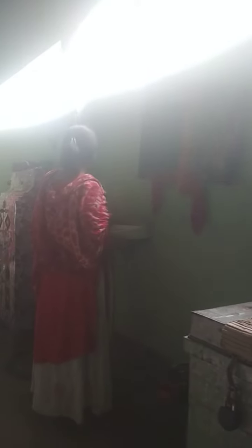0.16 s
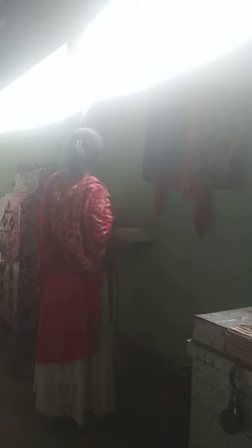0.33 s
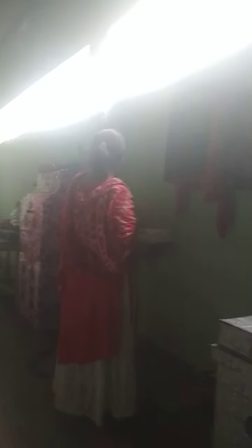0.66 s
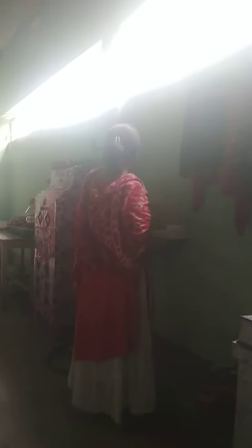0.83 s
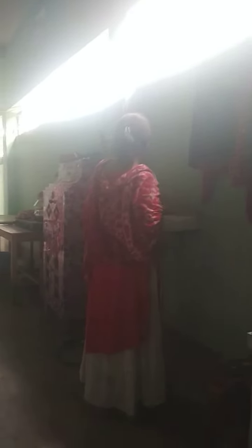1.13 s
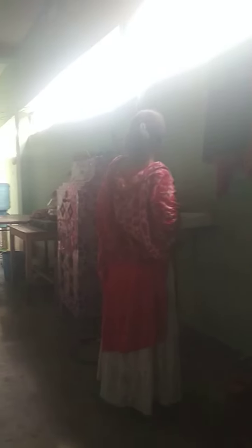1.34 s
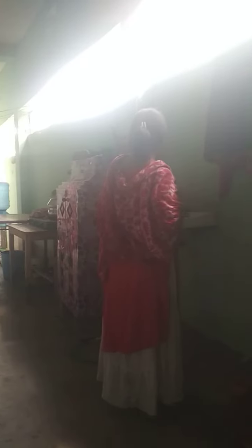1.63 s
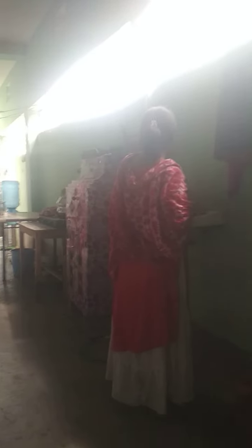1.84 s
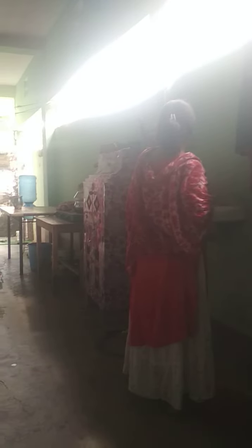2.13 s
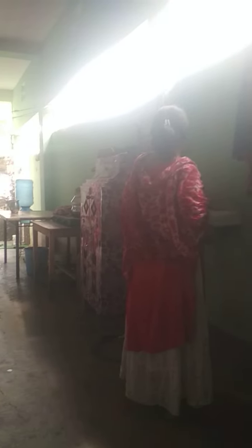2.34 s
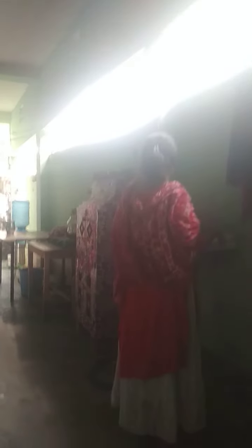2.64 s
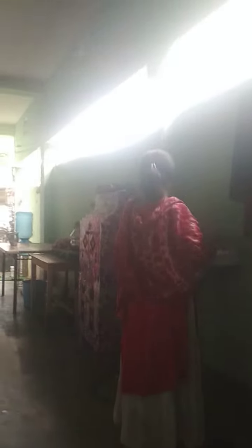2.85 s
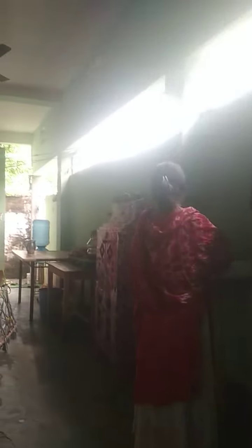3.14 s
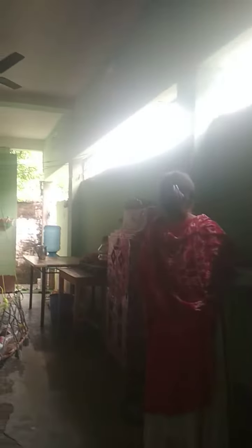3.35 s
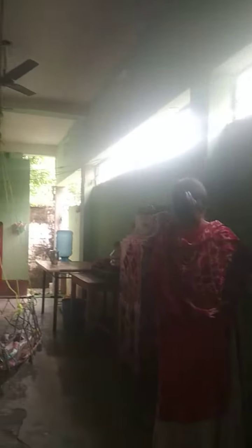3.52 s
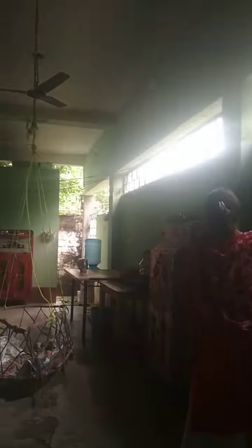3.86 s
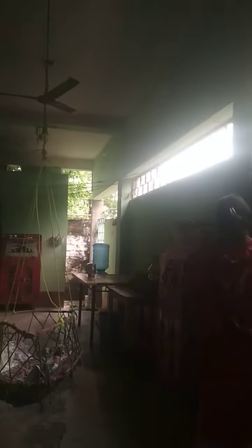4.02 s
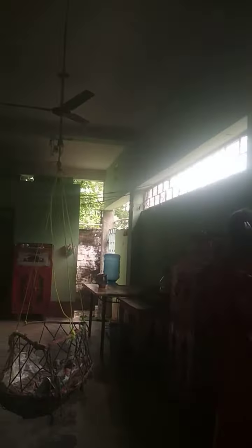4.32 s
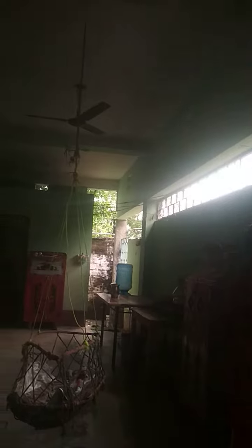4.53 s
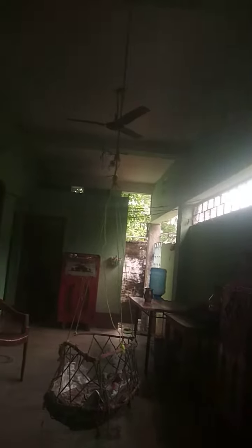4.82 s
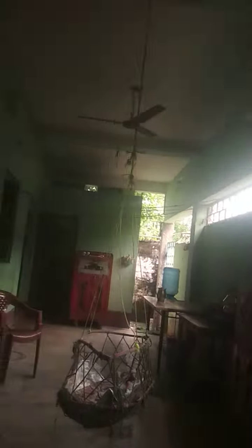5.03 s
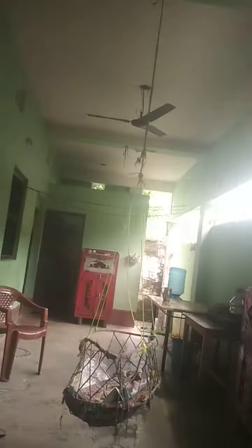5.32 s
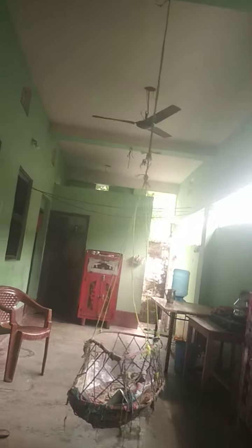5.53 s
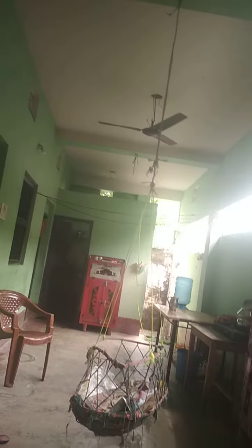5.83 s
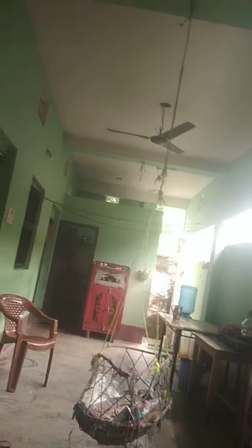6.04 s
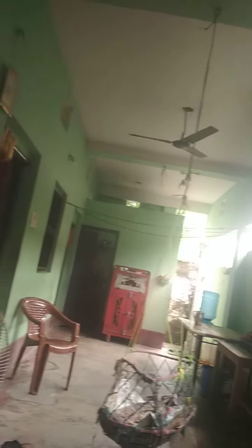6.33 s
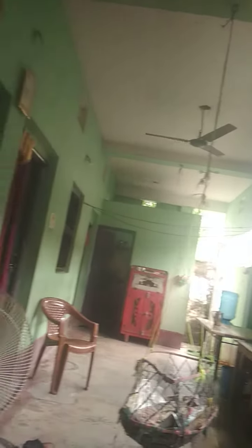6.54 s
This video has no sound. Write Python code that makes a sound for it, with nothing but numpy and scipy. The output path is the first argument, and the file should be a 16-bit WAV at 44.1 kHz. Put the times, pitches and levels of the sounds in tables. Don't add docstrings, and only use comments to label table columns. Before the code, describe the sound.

A steady low fan hum with a soft broad rush of air fills a bare concrete room, and its draught makes low, lumpy bumps on a phone microphone. From 0 to 1.7 seconds there are only drips, plinking bubbles, light spatter and faint slaps near 0.5 and 1.0, while a weak far motor drones at about 0.6 to 0.8 and 0.9 to 1.65. A full wet thump lands at 1.76 after a soft early touch, then more at 2.6, 3.2, 3.9 (the hardest), 4.65, 5.4 (boomier) and 6.2. Each is a dull cloth slap with a hollow tub boom and short wall rattle, echoing briefly. Between blows, droplets crackle, bubbles ring with gliding pitch, and water gurgles and fizzes from the cloth. Gusts are strongest around 3.5 to 4.8; the drone returns faintly near 2.4 and 4.3.

```python
import sys
import numpy as np
from scipy import signal
from scipy.io import wavfile
from scipy.ndimage import uniform_filter1d

SR = 44100
rng = np.random.default_rng(int(sys.argv[2]) if len(sys.argv) > 2 else 0)


def unload_audio(sound):
    columns = np.transpose(np.atleast_2d(sound))
    steps = np.round(np.clip(columns, -1, 1) * 32767)
    wavfile.write(sys.argv[1], SR, steps.astype(np.int16))


def ratio_of_db(decibels):
    return 10 ** (np.asarray(decibels, float) / 20)


N = 294527


def rms_one(x):
    return x / np.sqrt(np.mean(x ** 2) + 1e-20)


def at_hz(points, hz):
    point_hz, value = np.transpose(points)
    return np.interp(np.log(hz), np.log(point_hz), value)


def band(x, low_hz, high_hz):
    return signal.sosfilt(signal.butter(2, [low_hz, high_hz], "band", fs=SR, output="sos"), x)


def drift(rate_hz):
    r = np.exp(-80 * np.pi * rate_hz / SR)
    slow = signal.lfilter([1], [1, -2 * r, r * r], rng.standard_normal(N // 40 + 2002))
    slow = rms_one(slow[2000:])
    return np.interp(np.arange(N) / 40, np.arange(len(slow)), slow)


def ring(clicks, hz, t60_s):
    r = ratio_of_db(-60 / (t60_s * SR))
    w = 2 * np.pi * hz / SR
    return signal.lfilter([0, np.sin(w)], [1, -2 * r * np.cos(w), r * r], clicks + 1e-18)


def add(out, s, sound):
    i = round(s * SR)
    out[i:i + len(sound)] += sound[:N - i]


def grains(per_s, spread_db, low_hz, high_hz, cycles):
    sizes = ratio_of_db(spread_db * np.minimum(rng.exponential(1, N), 5)) * rng.choice([-1, 1], N)
    clicks = sizes * (rng.random(N) < per_s / SR)
    dealt = rng.integers(0, 14, N)
    pitches_hz = np.geomspace(low_hz, high_hz, 14)
    return rms_one(sum(ring(clicks * (dealt == k), hz, cycles / hz) for k, hz in enumerate(pitches_hz)))


# frequency in Hz, level in dB.
HUM_LINES = [
    (100, -48.5),
    (200, -67.5),
    (300, -82.5),
    (400, -63),
]
# frequency in Hz, density in dB per Hz.
AIR_SPECTRUM = [(35, -4), (65, -11.5), (109, 0), (152, -10.5), (206, -2), (396, -8), (560, -12),
                (1000, -14), (1500, -13.5), (2400, -22), (2900, -26), (4000, -31), (6350, -23.5),
                (7600, -44.5)]


def fan():
    t = np.arange(N) / SR
    hum = np.zeros(N)
    for hz, level_db in HUM_LINES:
        hum += ratio_of_db(level_db + 0.5 + 3.1 * drift(0.47)) * np.sin(2 * np.pi * hz * t + 0.28 * drift(5.0))
    edges_hz = 40 * 2 ** np.arange(0, 7.7, 1 / 4)
    white = rng.standard_normal((2, N))
    rush = np.zeros(N)
    for k, (low, high) in enumerate(zip(edges_hz, edges_hz[1:])):
        patch_db = at_hz(AIR_SPECTRUM, np.sqrt(low * high)) + 0.64 * drift(24)
        rush += ratio_of_db(patch_db) * band(white[k % 2], low, high)
    return hum + ratio_of_db(-52.5) * rms_one(rush)


# centre in seconds, peak in dB, length in seconds.
DRAUGHT_GUSTS = [(0.037, -44.5, 0.052), (0.256, -41, 0.15), (0.386, -40.5, 0.062), (0.529, -30.5, 0.15),
                 (0.715, -42, 0.1), (0.797, -35.5, 0.031), (0.898, -36.5, 0.079), (1.007, -37, 0.13),
                 (1.158, -39.5, 0.079), (1.43, -44.5, 0.12), (1.78, -31, .12), (1.97, -31.5, 0.19),
                 (2.191, -31.5, 0.14), (2.361, -29.5, .1), (2.7, -37.5, 0.32), (3.27, -44, .1),
                 (3.437, -46, 0.047), (3.526, -26.5, 0.18), (3.794, -32, 0.12), (3.89, -25.5, 0.046),
                 (4.04, -30, .06), (4.103, -25, 0.14), (4.513, -53.5, 0.19), (4.81, -27.5, 0.082),
                 (5.177, -37.5, 0.042), (5.306, -31, 0.087), (5.489, -38.5, 0.32), (6.326, -39.5, 0.091)]


def draught():
    lull_db = -46
    low_pass = signal.butter(2, 36, fs=SR, output="sos")
    lumps = signal.sosfilt(low_pass, band(rng.standard_normal(N), 5.3, 190))
    lumps = lumps / np.sqrt(uniform_filter1d(lumps ** 2, size=5000) + 1e-12)
    t = np.arange(N) / SR
    gusts = sum(ratio_of_db(db) * np.exp(-(2 * (t - s) / length_s) ** 2) for s, db, length_s in DRAUGHT_GUSTS)
    return (ratio_of_db(lull_db + 2.2 * drift(2.1)) + gusts) * lumps


# time in seconds, level in dB.
FLOW = [(0.0, -60.5), (0.8, -67.5), (0.95, -60.5), (1.13, -60), (1.38, -65), (1.6, -62.5), (1.77, -61.5),
        (2.16, -62.5), (3.31, -62), (3.64, -63.5), (4.54, -63), (4.74, -58.5), (4.95, -59.5), (5.21, -64.5),
        (6.06, -67), (6.34, -58.5), (6.53, -63.5), (6.68, -69.5)]


def runoff():
    gurgle_db, gurgle_follows = -57.5, 0.94
    fizz_db, fizz_follows = -65, 2.2
    flow_s, level_db = np.transpose(FLOW)
    flow_db = np.interp(np.arange(N) / SR, flow_s, level_db)
    flow_db = flow_db - flow_db.mean()
    gurgle = grains(2500 * ratio_of_db(3.0 * drift(8)), 2.5, 700, 2500, cycles=12.0)
    fizz = grains(5000 * ratio_of_db(3.0 * drift(12)), 2.5, 2600, 7500, cycles=3.0)
    gurgle = gurgle * ratio_of_db(gurgle_db + gurgle_follows * flow_db)
    return gurgle + fizz * ratio_of_db(fizz_db + fizz_follows * flow_db)


# start in seconds, peak in dB, frequency in Hz, T60 in seconds.
BUBBLES = [(0.266, -34.5, 844, .12), (0.375, -43, 1187, .13), (0.62, -49, 3060, .1), (0.799, -40, 871, .3),
           (0.839, -38, 575, .29), (1.177, -40, 880, .07), (1.192, -36, 1260, 0.065),
           (1.399, -44, 2970, .1), (1.399, -35, 1920, .051), (1.607, -36.5, 1730, 0.089),
           (2.072, -41.5, 2300, 0.066), (2.365, -42, 2200, .1), (2.0767, -48, 3880, .13),
           (2.1226, -44, 2830, .064), (2.152, -31.5, 960, .047), (2.182, -38.5, 1112, .15),
           (2.353, -34, 1025, .083), (3.515, -40.5, 3300, .076), (3.753, -40.5, 1730, .08),
           (4.286, -48, 4030, .1), (4.49, -32, 1300, 0.075), (4.926, -37.5, 1360, .18),
           (4.972, -33, 1808, 0.2), (5.032, -48, 4360, 0.067), (5.06, -40, 1630, .1),
           (5.465, -51, 4730, .2), (5.798, -50, 856, .09), (6.127, -39.5, 2150, 0.22),
           (6.51, -39, 547, 0.28)]


def drops():
    rise_hz_per_s, sag_above_hz, attack_s = 490, 2400, 0.0018
    out = np.zeros(N)
    t = np.arange(SR // 3) / SR
    wobble = 1.5 * drift(40)
    for s, peak_db, hz, t60_s in BUBBLES:
        glide = rise_hz_per_s if hz < sag_above_hz else -2 * rise_hz_per_s
        phase = 2 * np.pi * (hz * t + glide * t ** 2 / 2)
        phase = phase + np.resize(wobble[round(s * SR):], len(t))
        envelope = ratio_of_db(peak_db - 5.5 - 60 * t / t60_s) * (1 - np.exp(-t / attack_s))
        add(out, s, envelope * np.sin(phase))
    return out


# start in seconds, peak in dB, centre in Hz, length in seconds.
FINE_SPRAYS = [(0.507, -49, 6600, 0.013), (0.752, -42.5, 5330, 0.027), (0.878, -42, 5850, 0.014),
               (0.896, -48, 6770, .088), (1.01, -45, 6840, .04), (1.207, -48.5, 5240, .09),
               (1.564, -39.5, 5280, 0.014), (1.616, -48.5, 5170, 0.031), (1.691, -45, 5550, 0.038),
               (2.073, -49, 6000, 0.032), (1.96, -46, 5900, 0.026), (2.262, -44, 5220, .036),
               (2.56, -33.5, 5700, .013), (2.874, -39.5, 6200, .006), (2.968, -42.5, 5790, 0.02),
               (3.309, -42.5, 6900, 0.04), (3.321, -37.5, 5000, 0.024), (3.595, -44, 6700, 0.0099),
               (3.685, -40, 5400, 0.017), (4.082, -43, 4650, 0.009), (4.198, -49.5, 5150, 0.061),
               (4.279, -43, 5900, 0.026), (4.425, -44, 4770, 0.021), (4.788, -43, 6090, 0.039),
               (4.848, -40, 6590, 0.022), (4.999, -36, 6630, 0.02), (5.095, -47.5, 4830, 0.036),
                (5.985, -37.5, 5870, 0.0077), (6.252, -42, 5440, 0.027), (6.445, -47.5, 6100, 0.016)]
# start in seconds, peak in dB, centre in Hz.
SHORT_BURSTS = [(0.364, -49.5, 3450), (0.523, -45, 3700), (0.533, -45.5, 4760), (0.923, -45.5, 2930),
                (0.856, -49.5, 2710), (0.984, -51, 3580), (1.015, -46, 3380), (1.94, -52, 2720),
                (2.075, -52, 3930), (2.576, -44, 2750), (2.889, -45, 3000), (3.053, -42.5, 2570),
                (3.2765, -48.5, 2630), (3.316, -41, 3570), (2.556, -41, 3620), (3.525, -49, 3470),
                (3.856, -50, 2670), (3.874, -56, 3000), (3.91, -47, 2830), (4.538, -44, 3000),
                (4.546, -46, 6950), (4.555, -48, 4800), (4.59, -47, 3500), (4.654, -48, 2530),
                (5.419, -39.5, 2690), (5.6, -52.5, 6040), (5.785, -53.5, 6200), (6.1265, -55, 2700),
                (6.213, -56, 4070)]
# start in seconds, peak in dB, centre in Hz, length in seconds.
DULL_SLOSHES = [(0.533, -26, 1550, 0.0088), (0.548, -43.5, 1800, 0.03), (1.013, -40.5, 1510, 0.058),
                (0.914, -36.5, 1260, 0.03), (0.984, -27.5, 1425, 0.0091), (1.205, -38.5, 1720, .04),
                (2.871, -38.5, 1500, 0.026), (3.317, -36, 1340, 0.023), (3.685, -41, 1550, .027),
                (4.685, -33, 1030, 0.07), (4.962, -39, 1780, 0.13), (5.0594, -53, 1560, 0.056),
                (5.458, -21.5, 970, 0.02), (6.05, -48, 2110, .047), (6.247, -31, 1000, 0.047)]


def sprays():
    attack_s, spatter_s = 0.004, 0.031
    spray_octaves, spatter_octaves, slosh_octaves = 0.38, 0.54, 0.88
    bursts = [(*row, spray_octaves) for row in FINE_SPRAYS]
    bursts += [(*row, spatter_s, spatter_octaves) for row in SHORT_BURSTS]
    bursts += [(*row, slosh_octaves) for row in DULL_SLOSHES]
    out = np.zeros(N)
    droplets = grains(9000, 2.5, 900, 7800, cycles=3.0)
    t = np.arange(SR // 4) / SR
    for s, peak_db, hz, length_s, octaves in bursts:
        i = round(s * SR)
        half = 2 ** (octaves / 2)
        crackle = np.resize(droplets[i:i + len(t)], len(t))
        crackle = band(crackle, hz / half ** 2, hz * half ** 2)
        crackle = rms_one(band(crackle, hz / half, hz * half))
        envelope = (1 - np.exp(-t / attack_s)) * np.exp(-t / length_s)
        add(out, s - attack_s, ratio_of_db(peak_db - 7.5) * crackle * envelope)
    return out


# start in seconds, strength in dB, then boom, wall and slap in dB re the tub's usual ring.
BLOWS = [
    (0.531, -33, -9, 13, 15),
    (0.985, -33.5, 15.5, 1.5, 15.5),
    (1.7005, -15, -4, 8.5, 5.5),
    (1.758, 1, -1, -2, -2.5),
    (2.5902, 1, 0.5, 0, -2),
    (3.1787, -1, 0, 1.5, -7),
    (3.9196, 2, 0.5, 0.5, -2),
    (4.656, -1, 0, -1, -3),
    (5.4146, -1, 5.5, 1.5, -0.5),
    (6.2282, -0.5, 0.5, -1, -10.5),
]
# frequency in Hz, level in dB, T60 in seconds, first swing (1 out, -1 in).
TUB_MODES = [(60, -14, .06, 1), (98, -15.5, .5, 1), (104, -19, .4, 1), (149, -23, .33, 1),
             (173, -12, .45, 1), (191, -10.5, .33, 1), (226, -22, .3, 1), (265, -1.5, .12, -1),
             (303, -7, .4, 1), (415, -14, .11, -1), (513, -15, .18, -1), (580, -8.5, .28, -1),
             (640, -14, .15, -1)]
# frequency in Hz, level in dB, T60 in seconds.
WALL_MODES = [(363, -34.5, 0.021), (480.6, -38, 0.04), (575, -32, 0.021), (661, -50.5, 0.044),
              (820, -57, 0.0067), (1034, -33, 0.0092), (1150, -52, 0.015), (1550, -48.5, 0.016),
              (1888, -70, 0.0064), (2200, -64, 0.0035), (3950, -51, 0.0027), (5450, -48, 0.00091)]


def thumps():
    contact_s, rim_db = 0.0046, 4
    suck_db = -14
    s, strength_db, boom_db, wall_db, slap_db = np.transpose(BLOWS)
    out = np.zeros(N)
    t = np.arange(SR // 4) / SR
    push = np.sin(np.pi * np.clip(t / contact_s, 0, 1))
    unit_push = push * np.pi / (2 * contact_s * SR)

    shape = (len(s), len(t))
    lumps = rng.standard_normal(shape) * (rng.random(shape) < 4000 / SR)
    lumps = lumps * np.clip(t / 0.0015, 0, 1) * (np.exp(-t / 0.01) + 0.5 * np.exp(-t / 0.05))
    at = np.round(s * SR).astype(int)
    lumps = lumps * ratio_of_db(2 * drift(60)[at[:, None] + np.arange(len(t))])

    chance_db = rng.standard_normal((len(s), len(TUB_MODES)))
    for k, (hz, level_db, t60_s, swing) in enumerate(TUB_MODES):
        part_db = boom_db if hz < 130 else wall_db if hz > 350 else rim_db * (hz > 220)
        sizes = ratio_of_db(strength_db + part_db + level_db + chance_db[:, k])
        pushes = np.zeros(N)
        for start_s, size in zip(s, sizes):
            add(pushes, start_s, swing * size * unit_push)
        out += ring(pushes, hz, t60_s)
    for start_s, size in zip(s, ratio_of_db(strength_db + suck_db)):
        add(out, start_s, -size * push / push.max())
    for hz, level_db, t60_s in WALL_MODES:
        sizes = ratio_of_db(strength_db + level_db + (slap_db if hz > 900 else wall_db))
        rattle = np.zeros(N)
        for start_s, size, slump in zip(s, sizes, lumps):
            add(rattle, start_s, size * slump)
        out += ring(rattle, hz, min(t60_s, 24 / hz))
    return out


# frequency in Hz, T60 in seconds.
ROOM_DECAY = [
    (80, 0.94),
    (250, 0.38),
    (800, 0.55),
    (3000, 0.57),
    (7000, 0.5),
]


def room(x):
    t = np.arange(SR) / SR
    white = rng.standard_normal((2, SR))
    edges_hz = 40 * 2.0 ** np.arange(9)
    tail = np.zeros(SR)
    for k, (low, high) in enumerate(zip(edges_hz, edges_hz[1:])):
        tail += band(white[k % 2], low, high) * ratio_of_db(-60 * t / at_hz(ROOM_DECAY, low * 2 ** 0.5))
    tail = tail * np.clip((t - 0.008) / 0.015, 0, 1)
    x = signal.sosfilt(signal.butter(2, 200, "high", fs=SR, output="sos"), x)
    return signal.fftconvolve(x, tail / np.sqrt(np.sum(tail ** 2)))[:N]


# start in seconds, end in seconds, frequency in Hz, level in dB.
MOTOR_SPELLS = [
    (0.596, .84, 212.6, -59.5),
    (0.91, 1.652, 209, -51),
    (2.307, 2.586, 208.6, -56.5),
    (4.196, 4.554, 207, -53.5),
]


def drone():
    fade_s, waver_hz = 0.036, 3.74
    out = np.zeros(N)
    t = np.arange(N) / SR
    flutter = ratio_of_db(3.0 * drift(20))
    waver = 2 * np.pi * np.cumsum(waver_hz * drift(6.45)) / SR
    for start_s, end_s, hz, level_db in MOTOR_SPELLS:
        fade = np.clip(np.minimum(t - start_s, end_s - t) / fade_s, 0, 1)
        out += fade * ratio_of_db(level_db + 7) * flutter * np.sin(2 * np.pi * hz * t + waver)
    return out


def scene():
    room_db, spray_room_db = -7, -11.5
    tub = thumps()
    water = sprays() + drops() + runoff()
    echo = room(ratio_of_db(room_db) * tub + ratio_of_db(spray_room_db) * water)
    return (tub + water + echo + draught() + fan() + drone())[None, :]


def top_cut(x):
    return signal.sosfilt(signal.butter(12, 7650, fs=SR, output="sos"), x)


def record(dry):
    x = signal.sosfilt(signal.cheby2(10, 45, 8100, fs=SR, output="sos"), dry)
    dip = signal.lfilter(*signal.iirpeak(2950, 3.5, fs=SR), x)
    mix = 0.95 * np.tanh((x - 0.45 * dip) / 0.95)
    return top_cut(mix)


dry = scene()
out = record(dry)
unload_audio(out)
```